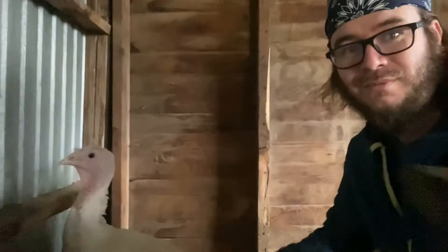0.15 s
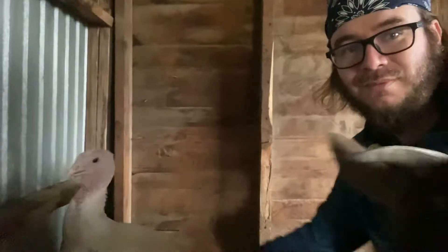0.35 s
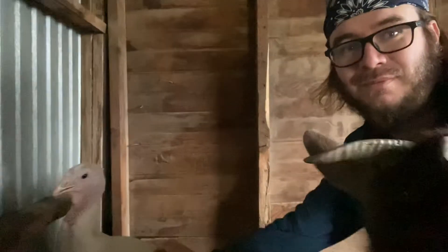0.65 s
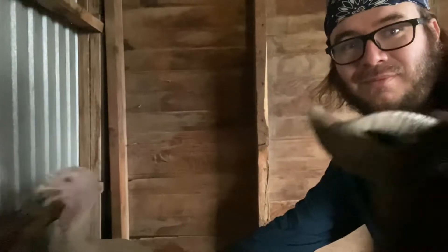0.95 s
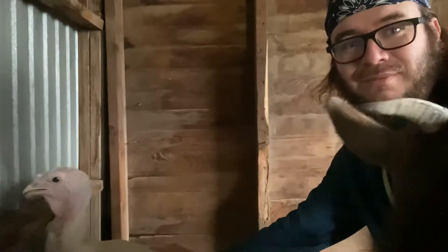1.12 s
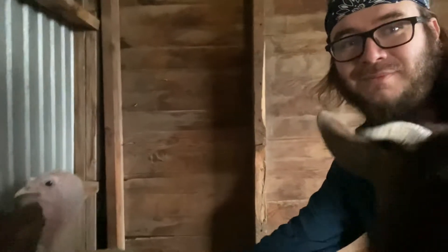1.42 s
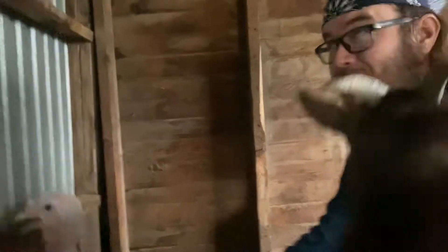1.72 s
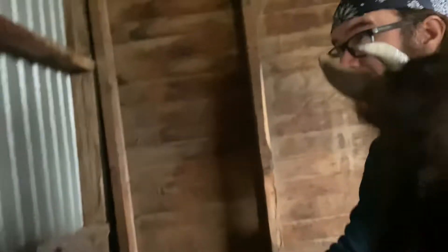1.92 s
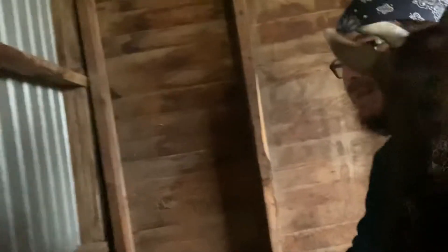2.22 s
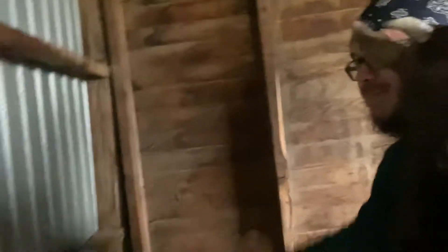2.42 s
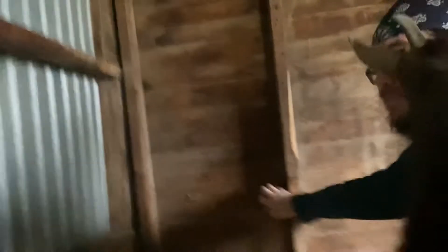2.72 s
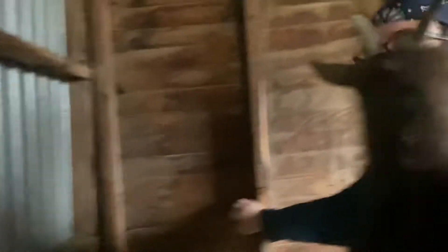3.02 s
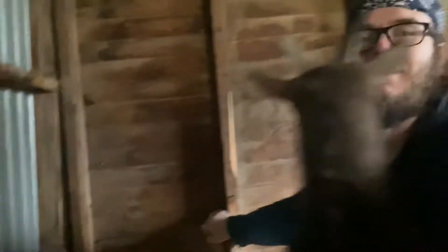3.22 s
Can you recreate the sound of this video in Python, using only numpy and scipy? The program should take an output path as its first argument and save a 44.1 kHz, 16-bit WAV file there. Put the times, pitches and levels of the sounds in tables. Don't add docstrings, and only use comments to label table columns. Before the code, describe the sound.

A turkey's harsh rapid clucks and fading yelps, with faint straw scuffing in a plank barn

```python
import sys
import numpy as np
from scipy import signal
from scipy.fft import rfft, irfft, next_fast_len
from scipy.io import wavfile
from scipy.ndimage import uniform_filter1d, map_coordinates

SR = 44100
rng = np.random.default_rng(int(sys.argv[2]) if len(sys.argv) > 2 else 0)


def waveform_to_disk(signal):
    frames = np.transpose(np.atleast_2d(signal))
    scaled = np.clip(frames, -1, 1) * 32767
    samples = np.round(scaled).astype(np.int16)
    wavfile.write(sys.argv[1], SR, samples)


def makeup_ratio(level_db):
    decades = np.asarray(level_db, float) / 20
    return 10 ** decades


N = 147735
SWELL_S = .011


def unit(x):
    return x / np.sqrt(np.mean(x ** 2) + 1e-20)


def along(points, hz):
    f, v = np.transpose(points)
    return np.interp(np.log(hz + 1), np.log(f + 1), v)


def wobble(rate, size):
    return map_coordinates(rng.standard_normal(int(rate) + 4), [np.arange(size) * rate / SR])


def filtered(x, response):
    n = x.shape[-1]
    m = next_fast_len(n + 8192)
    return irfft(rfft(x, m) * response(np.fft.rfftfreq(m, 1 / SR)), m)[..., :n]


def add(track, s, x):
    track[round(s * SR):][:len(x)] += x


def shape(t, length, attack, release):
    nearest_end = np.minimum(t / attack, (length - t) / release)
    return np.sin(np.pi / 2 * np.clip(nearest_end, 0, 1)) ** 2


def air():
    # (frequency [Hz], level [dB])
    air_tone = [(15, -35), (25, -26.5), (64, -7.5), (200, -13.5), (552, -21.5), (895, -25), (3000, -44),
                (3380, -35.5), (8080, -50.5), (10500, -95), (17800, -120)]
    # (frequency [Hz], likeness [0 to 1])
    likeness = [(60, 0.81), (240, 1), (480, 0.6), (960, 0), (8000, 0)]
    # (time [s], gain [dB])
    duck = [
        (0, -5),
        (.24, 1),
        (.3, -15.5),
        (.9, -10),
        (1.6, -5),
        (2.6, -14),
        (3.35, -16.5),
    ]
    angle = lambda hz: np.arccos(np.clip(along(likeness, hz), -1, 1)) / 2
    spread = lambda hz: makeup_ratio(along(air_tone, hz)) * [np.cos(angle(hz)), np.sin(angle(hz))]
    mid, side = filtered(rng.standard_normal((2, N)), spread)
    stereo = unit(np.array([mid + side, mid - side]))
    swell_db = 2.8 * map_coordinates(rng.standard_normal(60), [np.arange(N) * 12 / SR])
    s, db = np.transpose(duck)
    duck_db = np.interp(np.arange(N) / SR, s, db)
    return stereo * makeup_ratio(-44.5 + swell_db + duck_db)


def voice(pitch_hz, rough, throat, airy=.1, second=None, mix=0):
    n = len(pitch_hz)
    shake = 0.0027 * wobble(60, n) + 0.083 * rough * wobble(400, n)
    hz = pitch_hz * (1 + shake)
    phase = 2 * np.pi * np.cumsum(hz) / SR
    k = np.arange(1, 19)[:, None]
    gain_db = (1 - mix) * along(throat, k * hz) + mix * along(second or throat, k * hz)
    drift_db = 1.2 * np.array([wobble(40, n) for _ in k])
    start = 2 * np.pi * rng.random(k.shape)
    overtones = makeup_ratio(gain_db + drift_db) * (k * hz < 15000) * np.sin(k * phase + start)
    tone = np.sum(overtones, 0)
    smooth = lambda f: makeup_ratio(uniform_filter1d(along(throat, f), size=300)) * (f > 400)
    hiss = filtered(rng.standard_normal(SR // 4)[:n] * (1 + np.cos(phase)), smooth)
    flutter = makeup_ratio(7 * rough * wobble(300, n))
    return unit((unit(tone) + (rough + airy) * unit(hiss)) * flutter)


def cluck(row, turn_s, breaks):
    # (frequency [Hz], level [dB])
    low_throat = [(300, -49.5), (700, -20.5), (1200, -1), (1600, -5.5), (2150, -14), (2600, -23.5),
                  (4000, -22), (8500, -58.5)]
    # (frequency [Hz], level [dB])
    high_throat = [(300, -45), (800, -11), (1600, 0), (2400, -26), (3250, -25), (4100, -25), (6800, -38),
                   (8500, -62)]
    # (frequency [Hz], level [dB])
    puff_tone = [(30, 6.5), (100, 5), (300, 3.5), (600, -21)]
    high_hz, sag, after_s = 795, .1, .035
    low_rough, high_rough = .33, .17
    _, length, db, low_hz, turn = row
    t = np.arange(SR // 8) / SR - SWELL_S
    high = np.clip((t - turn) / turn_s + .5, 0, 1)
    sagging_hz = low_hz * (1 - sag * np.clip(t / turn, 0, 1))
    pitch = sagging_hz * (1 - high) + high_hz * high
    rough = low_rough + (high_rough - low_rough) * high * breaks
    sound = voice(pitch, rough, low_throat, airy=.05, second=high_throat, mix=high * breaks)
    puff = unit(filtered(rng.standard_normal(len(t)), lambda f: makeup_ratio(along(puff_tone, f))))
    body = shape(t, length, .005, .007)
    swell = makeup_ratio(-22) * shape(t + SWELL_S, 2 * SWELL_S, SWELL_S, SWELL_S)
    after = breaks * makeup_ratio(-15) * shape(t - turn, length - turn + after_s, 0.0033, after_s)
    sound = sound / np.sqrt(np.mean((body * sound) ** 2) / np.mean(body ** 2))
    return makeup_ratio(-9.5 + db) * ((body + swell + after) * sound + makeup_ratio(-28.5) * body * puff)


def clucks():
    # (time [s], length [s], level [dB], low pitch [Hz], upward turn after [s])
    sweeping = [
        (.236, .037, 0, 630, .029),
        (.480, .035, -1, 645, .027),
        (3.041, .044, -4, 590, .032),
    ]
    # (time [s], length [s], level [dB], low pitch [Hz], break after [s])
    breaking = [
        (.710, .051, -2, 600, .016),
        (2.555, .035, -2.5, 690, .016),
        (2.736, .038, -3.5, 700, .018),
    ]
    out = np.zeros(N)
    for row in sweeping:
        add(out, row[0] - SWELL_S, cluck(row, .014, False))
    for row in breaking:
        add(out, row[0] - SWELL_S, cluck(row, .007, True))
    return out


def yelps():
    # (time of the clear part [s], length [s], level [dB], pitch [Hz])
    yelp_calls = [
        (0.942, 0.063, -12, 625.8),
        (1.182, 0.074, -15, 623),
        (1.445, 0.075, -16, 614.6),
        (1.71, 0.086, -18, 613.4),
    ]
    # (frequency [Hz], level [dB])
    yelp_throat = [(300, -39), (620, -5.5), (1250, 0.5), (1870, -7), (2480, -16.5), (3700, -23.5),
                   (6800, -35.5), (8500, -60.5)]
    lead_s, lead_hz, drop_s, sag = .027, 790, .008, .045
    lead_db, fade_db, close_db = -10, -2, -19.5
    out = np.zeros(N)
    for s, length, db, pitch_hz in yelp_calls:
        t = np.arange(int((lead_s + length + .045) * SR)) / SR - lead_s
        marks = [-lead_s, -drop_s, 0, .015, .6 * length, length, length + .012, length + .025]
        low = pitch_hz * (1 - sag)
        pitch = np.interp(t, marks, [lead_hz, lead_hz, .98 * pitch_hz, pitch_hz, pitch_hz, low, low, low])
        rough = np.interp(t, marks, [.45, .45, .25, .03, .02, .05, .5, .7])
        level_db = np.interp(t, marks, [lead_db - 10, lead_db, -2, 0, fade_db, fade_db, close_db - 3, close_db])
        fade = shape(t + lead_s, lead_s + length + 0.046, 0.0067, 0.0087)
        add(out, s - lead_s, makeup_ratio(db + level_db) * fade * voice(pitch, rough, yelp_throat, airy=0.067))
    return out


def glide(row, throat, rough, attack, bend=1, airy=0.05):
    _, length, db, first_hz, last_hz = row
    t = np.arange(int(length * SR)) / SR
    pitch = first_hz + (last_hz - first_hz) * (t / length) ** bend
    return t, makeup_ratio(db) * shape(t, length, attack, 0.0072) * voice(pitch, rough, throat, airy=airy)


def rising_note():
    # (time [s], length [s], level [dB], first pitch [Hz], last pitch [Hz])
    rise_call = [
        (1.738, .098, -23, 440, 712),
    ]
    # (frequency [Hz], level [dB])
    rise_throat = [(300, -21), (480, 5.5), (700, -4), (1400, -3), (2100, -12.5), (2800, -21.5),
                   (3500, -16.5), (8000, -53.5)]
    out = np.zeros(N)
    for row in rise_call:
        add(out, row[0], glide(row, rise_throat, .08, .008, bend=.42, airy=.1)[1])
    return out


def squeak():
    # (time [s], length [s], level [dB], first pitch [Hz], last pitch [Hz])
    squeak_call = [
        (1.942, .085, -24.5, 1156, 1077),
    ]
    # (frequency [Hz], level [dB])
    squeak_throat = [(350, -60), (800, -4), (1120, -3.5), (2200, -9.5), (2800, -31), (3300, -17.5),
                     (8000, -57.5), (9500, -68.5)]
    out = np.zeros(N)
    for row in squeak_call:
        t, note = glide(row, squeak_throat, 0.14, 0.033, airy=.15)
        pulse = 1 + .5 * np.cos(2 * np.pi * 310 * t)
        add(out, row[0], note * pulse)
    return out


def hoof_scuff():
    # (time [s], length [s], level [dB])
    scuff_event = [
        (2.018, 0.079, -27.5),
    ]
    # (frequency [Hz], level [dB])
    straw_tone = [(120, -57), (200, -21.5), (371, -7), (446, -16.5), (667, 0.5), (766, -6), (1140, -3),
                  (8000, -65), (10400, -87), (17600, -120)]
    out, t = np.zeros(N), np.arange(SR // 8) / SR
    for s, length, db in scuff_event:
        clumps = rng.standard_normal(len(t)) * makeup_ratio(2.8 * wobble(130, len(t)))
        grit = filtered(clumps, lambda f: makeup_ratio(along(straw_tone, f)))
        add(out, s, makeup_ratio(db) * shape(t, length, 0.016, 0.028) * unit(grit))
    return out


def whines():
    # (time [s], length [s], level [dB], first pitch [Hz], last pitch [Hz])
    whine_calls = [
        (2.14, 0.054, -15.5, 907, 910),
        (2.182, 0.044, -16, 878.5, 764.5),
        (2.354, .044, -15.5, 852, 800),
    ]
    # (frequency [Hz], level [dB])
    whine_throat = [(300, -41), (850, 1.5), (1800, -6.5), (2700, -14), (3500, -19), (4600, -30),
                    (6400, -43), (9000, -79)]
    out = np.zeros(N)
    for row, attack in zip(whine_calls, (.02, .01, .007)):
        add(out, row[0], glide(row, whine_throat, 0.09, attack, bend=1.1, airy=0.067)[1])
    return out


def murmurs():
    # (time [s], length [s], level [dB], first pitch [Hz], last pitch [Hz])
    murmur_calls = [
        (2.217, 0.025, -36.5, 519, 493),
        (2.396, 0.032, -23, 608.6, 565),
        (2.817, 0.015, -31.5, 616, 566),
    ]
    # (frequency [Hz], level [dB])
    murmur_throat = [(300, -22), (600, -1), (1200, -4), (1800, -13.5), (3000, -18), (8000, -60)]
    out = np.zeros(N)
    for row in murmur_calls:
        add(out, row[0], glide(row, murmur_throat, .22, .008)[1])
    return out


def hoof_thud():
    # (time [s], length [s], level [dB], pitch [Hz])
    thud_event = [
        (2.585, .06, -44.5, 81),
    ]
    out, t = np.zeros(N), np.arange(SR // 8) / SR
    for s, length, db, hz in thud_event:
        add(out, s, makeup_ratio(db) * shape(t, length, .015, .03) * np.sin(2 * np.pi * hz * t))
    return out


def tail(share, level_db):
    # (frequency [Hz], time to fall 60 dB [s])
    ring_time = [(300, 0.39), (1000, 0.27), (3000, 0.26), (8000, 0.31)]
    hz, t, z = signal.stft(rng.standard_normal((2, SR // 2)), SR, nperseg=256)
    decay = makeup_ratio(-60 * t / (share * along(ring_time, hz)[:, None]))
    sound = signal.istft(z * decay, SR, nperseg=256)[1]
    return makeup_ratio(level_db) * sound / np.linalg.norm(sound[0])


def barn(x):
    # (frequency [Hz], left over right [dB])
    lean = [(300, -2), (900, -2), (1500, -4.5), (2600, -8), (7600, -8.5)]
    wall_db, lag_s = -13, -.00018
    delays = .012 * rng.random((2, 6, 1)) + 0.0004543
    signs = rng.choice([-1, 1], (2, 6, 1))
    side = np.array([[.5], [-.5]])
    echoes = lambda f: np.sum(signs * np.exp(-2j * np.pi * f * delays), 1) / 2
    walls = lambda f: makeup_ratio(wall_db) * (f > 300) * echoes(f)
    direct = lambda f: np.exp(-2j * np.pi * f * side * lag_s)
    ports = lambda f: makeup_ratio(side * along(lean, f)) * (direct(f) + walls(f))
    scatter = tail(1, -12.5) + tail(0.33, -9)
    room = filtered(scatter, lambda f: makeup_ratio(side * along(lean, f) / 2) * (f > 300))
    late = np.pad(x, (200, 0))[None]
    return filtered(x, ports) + signal.fftconvolve(late, room, axes=1)[:, :N]


def scene():
    birds = clucks() + yelps() + rising_note() + squeak() + whines() + murmurs()
    hoof = hoof_scuff() + hoof_thud()
    return air() + barn(birds + hoof)


def band_limit(x):
    return signal.sosfilt(signal.butter(12, 8230, fs=SR, output="sos"), x)


def record(dry):
    # (frequency [Hz], level [dB])
    band_edge = [(8200, 0), (8600, -6), (12000, -14), (15200, -30), (16000, -90)]
    ceiling = .88
    held = dry / (1 + np.abs(dry / ceiling) ** 6) ** (1 / 6)
    mix = filtered(held, lambda f: makeup_ratio(along(band_edge, f)))
    return band_limit(mix)


dry = scene()
out = record(dry)
waveform_to_disk(out)
```